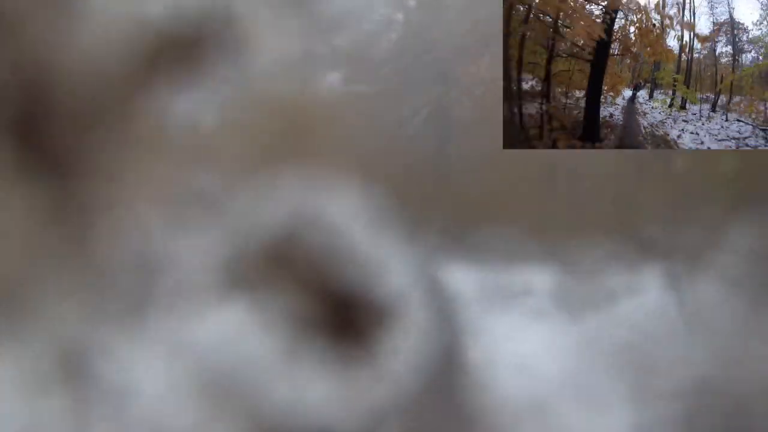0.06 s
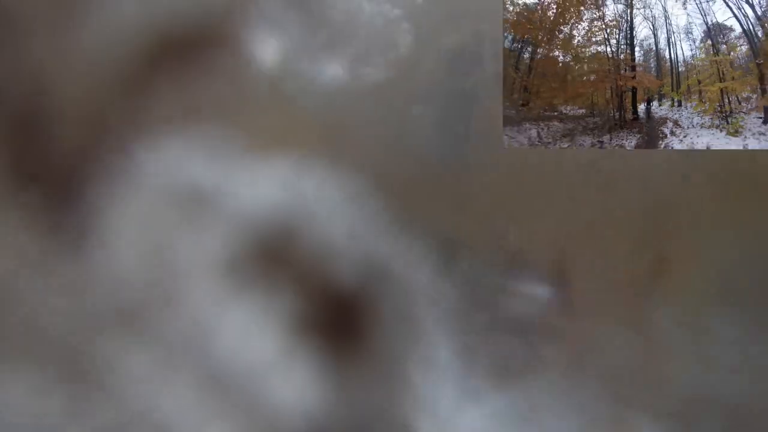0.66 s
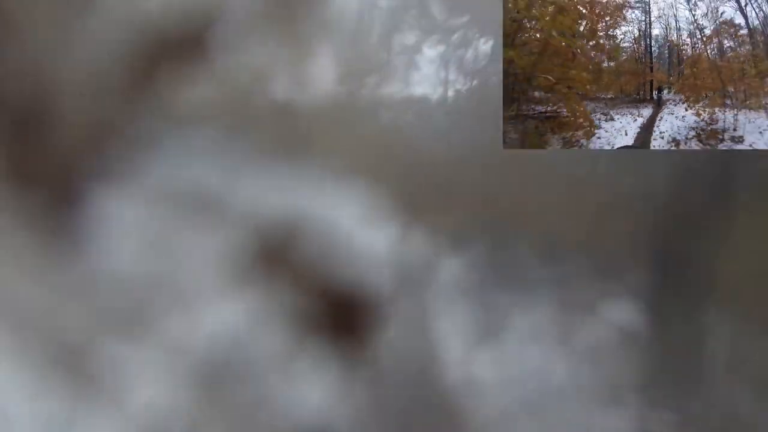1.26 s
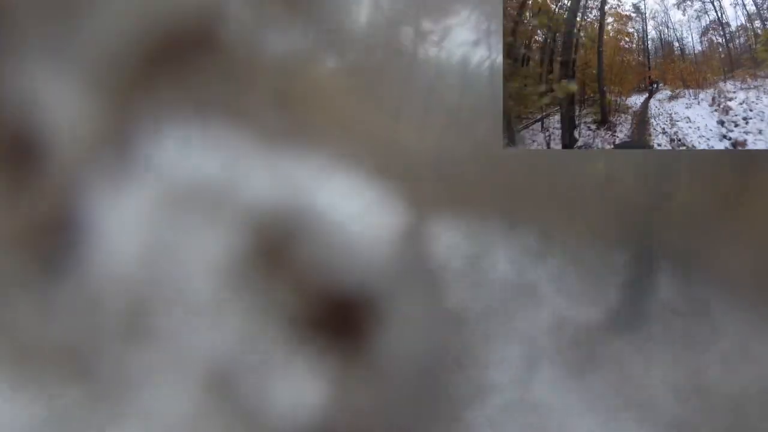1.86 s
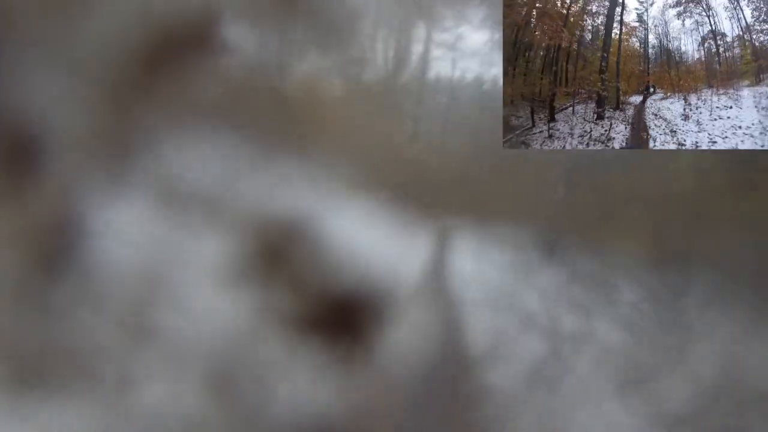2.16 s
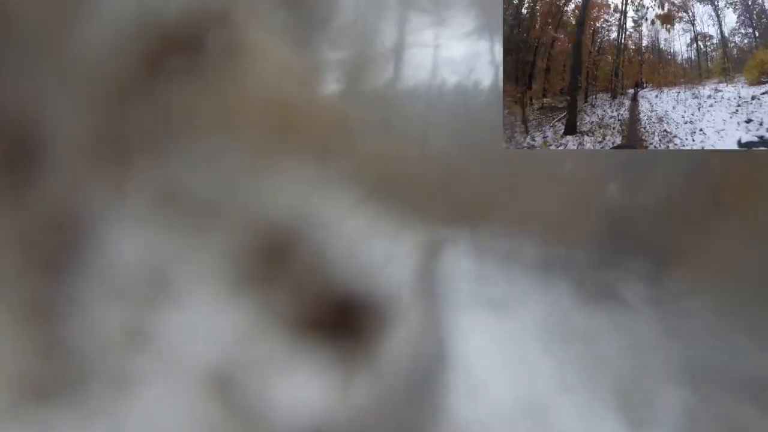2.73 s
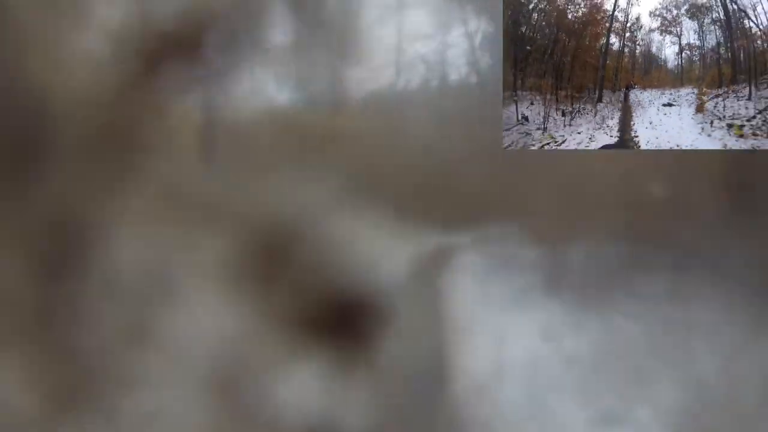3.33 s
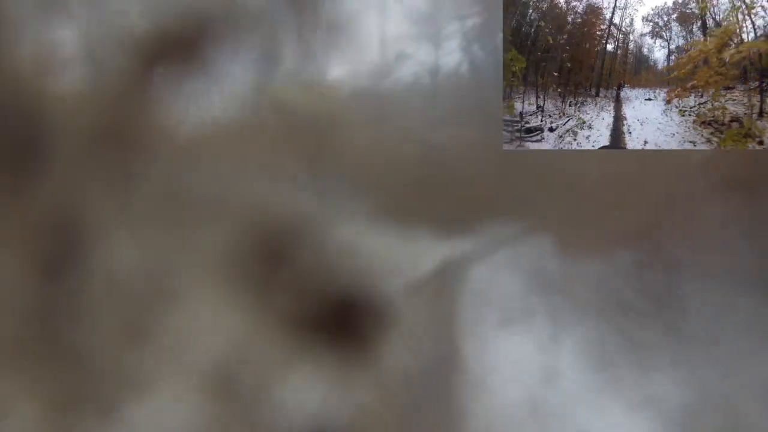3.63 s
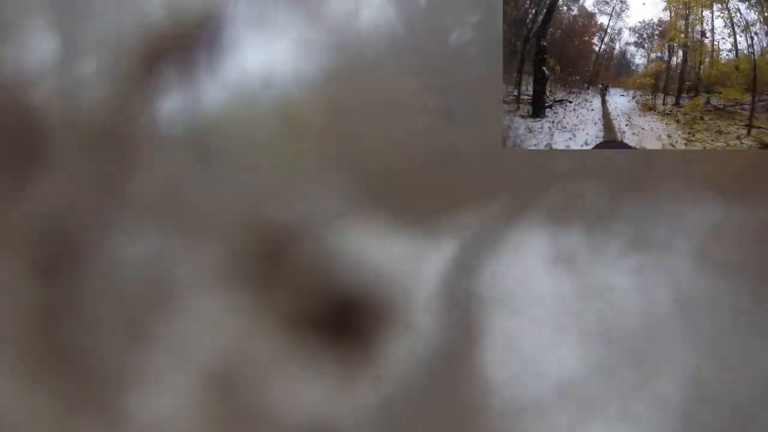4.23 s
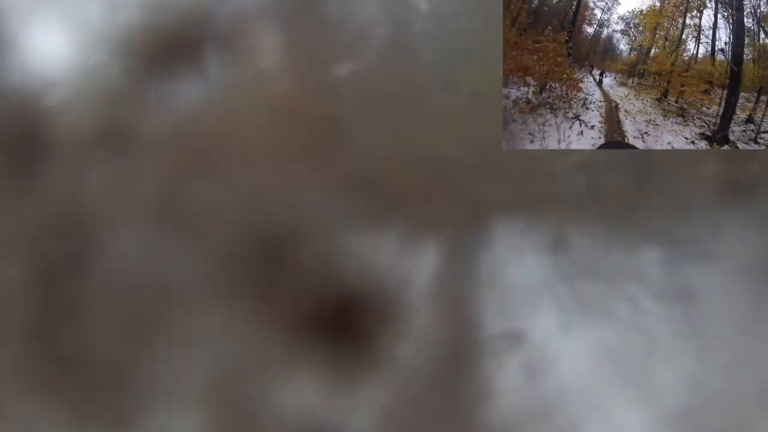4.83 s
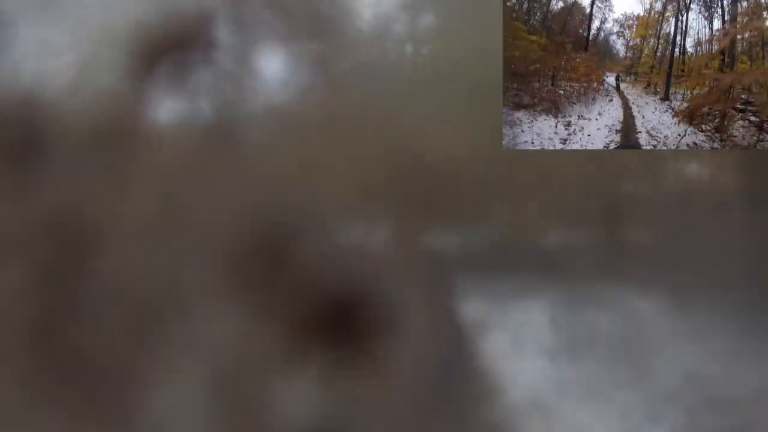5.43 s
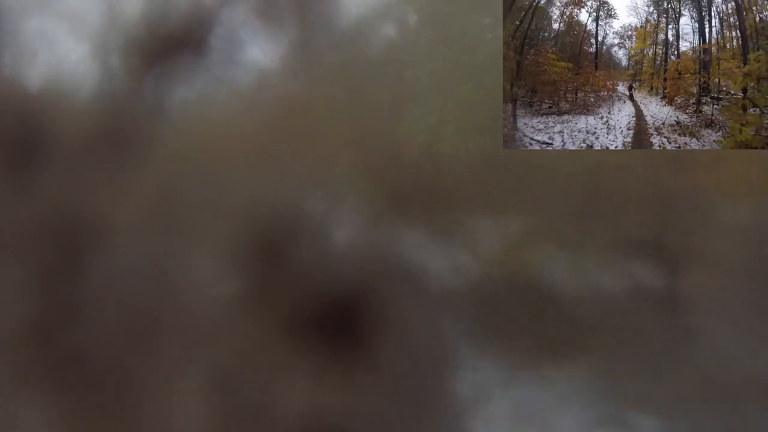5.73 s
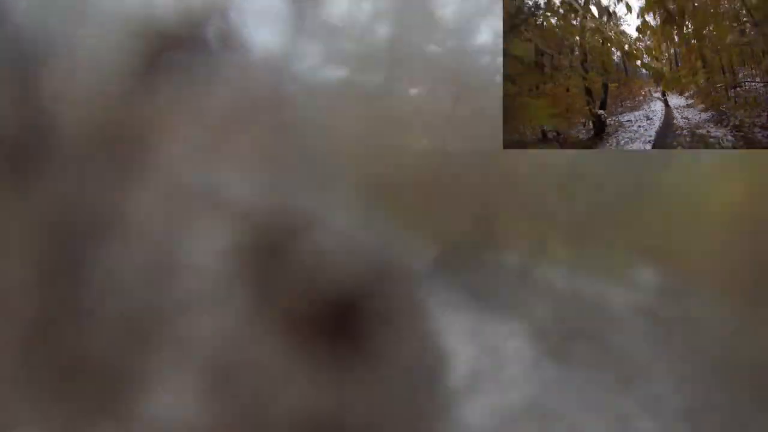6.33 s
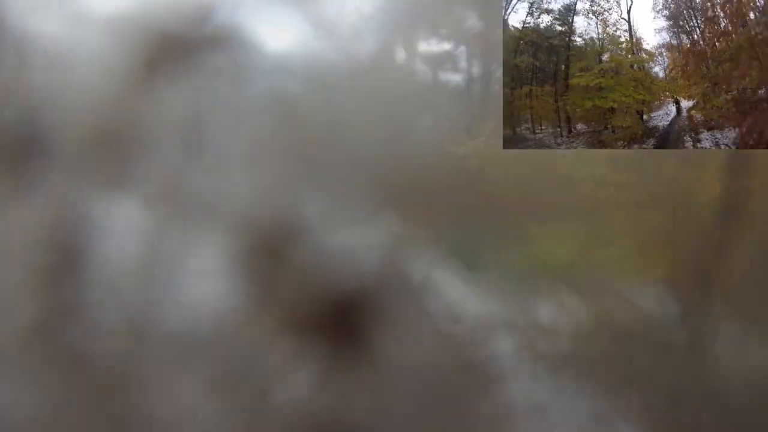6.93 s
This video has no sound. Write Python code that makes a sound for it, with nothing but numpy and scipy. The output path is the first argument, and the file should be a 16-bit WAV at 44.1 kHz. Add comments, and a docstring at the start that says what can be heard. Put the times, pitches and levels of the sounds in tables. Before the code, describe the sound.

Loud, uneven tyre rumble and gritty mud noise come from a mountain bike on a wet forest trail, picked up on the bike itself. Roots and stones knock it, the camera mount booms and its case rattles, with wind thumping on the microphone. After a couple of seconds, occasional light metal clinks join in, followed by a few brief buzzes from the tread.

```python
"""A muddy forest trail, heard close up from the microphone of a camera riding on a mountain bike.
From the start the tyres roar, going light after each bump, and roots and stones knock the bike; the
mount booms at its low resonance and the case rattles at the crests of its swings. Wind buffets the
microphone, hardest at about 1.6 s. From 2.6 s loose parts clink now and then, and between 3.3 and
6.3 s the tread buzzes in short stretches."""
import sys
import numpy as np
from scipy import signal
from scipy.fft import rfft, irfft, next_fast_len
from scipy.io import wavfile
from scipy.ndimage import uniform_filter1d, minimum_filter1d, map_coordinates

SR = 44100
rng = np.random.default_rng(int(sys.argv[2]) if len(sys.argv) > 2 else 0)


def inscribe(sig):
    """Save sig as 16-bit PCM at rate SR to the path in sys.argv[1].

    A 1-D sig is mono; a 2-D sig holds one channel per row.
    Samples are clipped to [-1, 1] before scaling.
    """
    pcm = np.round(np.clip(np.atleast_2d(sig).T, -1, 1) * 32767)
    wavfile.write(sys.argv[1], SR, pcm.astype(np.int16))


N = 312228

# tread rumble and mud roar along the trail: time_s, tread_db, mud_db
TYRE_LEVELS = [(0.0, -25.5, -42.5), (0.3, -20.5, -37.5), (0.44, -31, -42), (0.62, -20, -38),
               (0.68, -33.5, -43.5), (0.9, -23, -36.5), (1.04, -24.5, -43), (1.14, -22.5, -37.5),
               (1.92, -27.5, -42), (2.04, -18, -38.5), (2.14, -26, -42.5), (2.66, -22, -35.5),
               (2.82, -24, -40.5), (3.14, -23, -39.5), (3.22, -29.5, -43.5), (3.58, -17.5, -38),
               (3.7, -26.5, -37.5), (3.98, -21, -35), (4.1, -24, -39.5), (4.82, -28.5, -44.5),
               (4.92, -21.5, -38.5), (5.78, -25, -41.5), (5.92, -21, -39), (6.7, -27, -35.5),
               (6.8, -29.5, -42.5), (7.07, -22.5, -38)]
# bumps that set the camera mount booming: start_s, hold_s, swing_db
BUMPS = [(0.01, 0.11, -10), (0.231, 0.11, -11.5), (0.388, 0.0051, -7.5), (0.465, 0.045, -10.5),
         (0.608, 0.061, -7), (0.77, .04, -8.5), (0.919, 0.064, -7), (1.058, .12, -10), (1.246, 0.019, -7.5),
         (1.351, 0.045, -9.5), (1.49, 0.11, -13), (1.653, 0.012, -8), (1.824, 0.017, -10),
         (2.056, 0.074, -8.5), (2.209, 0.033, -11), (2.322, 0.031, -11), (2.487, 0.016, -13.5),
         (2.591, 0.072, -7.5), (2.772, 0.039, -11), (2.887, 0.025, -9), (3.012, 0.018, -9.5),
         (3.092, 0.11, -12.5), (3.217, 0.0036, -12.5), (3.325, 0.027, -10.5), (3.611, 0.022, -6),
         (3.729, 0.13, -9), (4.039, .05, -6), (4.188, 0.005, -7.5), (4.29, 0.022, -9.5),
         (4.412, 0.11, -10.5), (4.549, 0.11, -10.5), (4.709, .05, -11.5), (4.92, 0.018, -7),
         (5.041, 0.082, -13), (5.282, .015, -8), (5.379, 0.049, -10), (5.55, 0.068, -10.5),
         (5.708, 0.072, -10.5), (5.849, 0.35, -11.5), (6.052, 0.056, -18.5), (6.243, 0.23, -11),
         (6.4, 0.16, -10.5), (6.63, 0.047, -10.5), (6.711, .015, -12), (6.788, 0.12, -11.5),
         (6.958, 0.086, -14)]
# low resonances of the frame and tyres: pitch_hz, width_hz, gain_db
FRAME_MODES = [(154.6, 30.6, 1), (191.3, 37.5, 0), (231.66, 32, -7), (297.4, 41.6, -10), (376.2, 21, -15.5),
               (435.6, 43, -16)]
# resonances of the camera case: pitch_hz, width_hz, gain_db
CASE_MODES = [(642.5, 85, -4), (812, 114, -0.5), (852, 66, 3.5), (1200, 61, 0.5), (1360, 86, 2.5),
              (1540, 269, 2), (1620, 190, 3), (2004, 199, -0.5), (4630, 610, -29)]


def amp(db):
    """Decibels to gain."""
    return 10 ** (np.asarray(db) / 20)


def unit(x):
    """Scale to rms 1."""
    return x / np.sqrt(np.mean(x ** 2) + 1e-20)


def curves(rows):
    """One value per sample for each column after the time."""
    times, *columns = np.transpose(rows)
    return [np.interp(np.arange(N) / SR, times, column) for column in columns]


def wobble(rate):
    """A smooth random curve, rate knots a second."""
    return map_coordinates(rng.standard_normal(int(N * rate / SR) + 4), [np.arange(N) * rate / SR])


def filtered(x, response):
    """x through a complex response of frequency."""
    size = next_fast_len(N + SR // 2)
    return irfft(rfft(x, size) * response(np.fft.rfftfreq(size, 1 / SR)), size)[:N]


def coloured(x, points):
    """x through a curve of (frequency_hz, gain_db) points on a log axis."""
    points_hz, db = np.transpose(points)
    return filtered(x, lambda hz: amp(np.interp(np.log(hz + 1), np.log(points_hz), db)))


def resonate(x, modes):
    """x rings a body whose resonances alternate in sign."""
    return filtered(x, lambda hz: sum(
        (-1) ** k * amp(db) * 1j * hz * width / (pitch ** 2 - hz ** 2 + 1j * hz * width)
        for k, (pitch, width, db) in enumerate(modes)))


def add(track, start_s, sound):
    """Mix a sound into a track."""
    part = track[max(round(start_s * SR), 0):][:len(sound)]
    part += sound[:len(part)]


def taps(times, levels_db):
    """One hard contact at each time."""
    track = np.zeros(N)
    for start_s, db in zip(times, levels_db):
        add(track, start_s, amp([db]))
    return track


def bursts(times, levels_db, t60_s):
    """A short dying puff of noise at each time."""
    track, t = np.zeros(N), np.arange(SR // 5) / SR
    for start_s, db in zip(times, levels_db):
        add(track, start_s, amp(db - 60 * t / t60_s) * rng.standard_normal(len(t)))
    return track


def blow_envelope(times, holds, levels_db, fall_db_per_s, rise_s=0.026):
    """Envelope of blows that each rise, hold and die away, adding in power."""
    t, power = np.arange(N) / SR, np.zeros(N)
    for start_s, hold_s, db in zip(times, holds, levels_db):
        near = slice(max(int((start_s - rise_s) * SR), 0), int((start_s + hold_s + .3) * SR))
        age = t[near] - start_s
        rise = np.clip(1 + age / rise_s, 0, 1)
        power[near] += (rise * amp(db - fall_db_per_s * np.maximum(age - hold_s, 0))) ** 2
    return np.sqrt(power)


def wind(gust_db=2):
    """Eddies thump right on the microphone port."""
    # strength of the buffeting: time_s, level_db
    buffet_levels = [(0.0, -20.5), (0.12, -29.5), (1.26, -23), (1.32, -35), (1.56, -14), (1.63, -22),
                     (3.19, -22.5), (3.59, -36), (3.82, -22.5), (3.9, -31), (4.81, -18.5), (6.39, -26.5),
                     (6.68, -20), (7.08, -21.5)]
    # spectrum of the wind rumble: frequency_hz, gain_db
    rumble_colour = [(5, -38.5), (15, -21.5), (24, 10), (36, 1.5), (50, -12), (100, -5), (300, -26),
                     (1000, -101.5)]
    buffet_db, = curves(buffet_levels)
    gusts = amp(gust_db * wobble(16))
    return amp(buffet_db) * unit(gusts * coloured(rng.standard_normal(N), rumble_colour))


def spray(under_roar_db=-24.5, patter_db=3):
    """Slush hisses off the tyres along with the roar of the mud."""
    # spectrum of the fine wet spray: frequency_hz, gain_db
    spray_colour = [(1800, -36.5), (2600, 10), (3700, -1.5), (4400, -7), (5000, 5.5), (5400, -18.5),
                    (7200, -17.5), (12000, -29.5)]
    _, mud_db = curves(TYRE_LEVELS)
    patter = rng.standard_normal(N) * amp(patter_db * wobble(820))
    return amp(mud_db + under_roar_db) * unit(coloured(patter, spray_colour))


def tread_buzz():
    """The knobs of the tread buzz, swelling and fading, likely on firmer ground."""
    # stretches of buzzing: start_s, length_s, level_db
    stretches = [(3.278, 0.5, -36.5), (3.753, 0.4, -41), (4.95, 0.27, -36.5), (5.788, 0.53, -34.5)]
    # narrow resonances that the tread rings: pitch_hz, width_hz, gain_db
    buzz_modes = [(444, 16, 9), (616, 11, 3), (780, 16, 1), (1194, 65, -5), (1385, 17, -12.5),
                  (2032, 77, -6.5)]
    level = np.zeros(N)
    for start_s, length_s, db in stretches:
        add(level, start_s, amp(db) * np.sin(np.linspace(0, np.pi, int(length_s * SR))))
    return level * unit(resonate(rng.standard_normal(N), buzz_modes))


def tyre_load_db(dip_db=3, lag_s=0.045, width_s=.04):
    """The wheel rebounds off each bump, and the tyre quietens until it settles."""
    t = np.arange(N) / SR
    lightness = sum(np.exp(-((t - start_s - hold_s - lag_s) / width_s) ** 2)
                    for start_s, hold_s, _ in BUMPS)
    return -dip_db * (lightness - lightness.mean())


def tyres(rumble_db=-1, thump_db=-19, tread_lumps_db=2, mud_lumps_db=1.3, grit_db=3.5):
    """Tread shakes the frame in lumps, harder on meeting a bump; gritty mud roars through the case."""
    # what the case wall lets through: frequency_hz, gain_db
    case_wall = [(250, -21.5), (550, 10), (2120, -1.5), (2300, -1), (3600, 1.5), (4500, -23), (5500, -4),
                 (7000, -6), (11000, -13), (15000, -41)]
    tread_db, mud_db = curves(TYRE_LEVELS) + tyre_load_db()
    times, _, swing_db = np.transpose(BUMPS)
    thumps = blow_envelope(times, np.zeros(len(times)), swing_db + thump_db, fall_db_per_s=306)
    lumps = wobble(45)
    tread = resonate(rng.standard_normal(N) * amp(tread_lumps_db * lumps), FRAME_MODES)
    tread = coloured(tread, [(70, -19.5), (125, -9.5), (155, -1.5), (480, -1), (700, -4), (3000, -50)])
    mud = rng.standard_normal(N)
    mud *= amp(mud_lumps_db * np.minimum(lumps, 1) + grit_db * np.minimum(wobble(300), 1.5))
    mud = coloured(resonate(mud, CASE_MODES), case_wall)
    return np.hypot(amp(tread_db + rumble_db), thumps) * unit(tread) + amp(mud_db) * unit(mud)


def clinks(scrape_db=8, attack_s=.0045):
    """A loose metal part scrapes against its neighbour, then rings briefly."""
    # contacts of loose parts: start_s, level_db, pitch_hz, t60_s
    contacts = [(2.636, -17, 1380, 0.12), (2.859, -24, 1190, 0.12), (3.085, -21, 1540, .08),
                (3.885, -25, 1400, 0.1), (4.16, -28, 1370, 0.08), (4.410, -23, 1420, 0.03),
                (6.233, -16, 1430, 0.04), (6.662, -17, 1263, 0.07)]
    rings, t = np.zeros(N), np.arange(SR // 4) / SR
    for start_s, db, pitch_hz, t60_s in contacts:
        tone = np.sin(2 * np.pi * pitch_hz * t + rng.uniform(0, 2 * np.pi))
        add(rings, start_s, amp(db - 60 * t / t60_s) * (1 - np.exp(-t / attack_s)) * tone)
    times, levels_db = np.transpose(contacts)[:2]
    scrapes = bursts(times, levels_db + scrape_db, t60_s=0.045)
    scrape_colour = [(600, -44), (1150, -2), (1550, -6), (2000, -19), (3000, -16.5), (6000, -48)]
    return rings + coloured(scrapes, scrape_colour)


def knocks(clack_gain_db=11, thud_gain_db=20, contact_db=17):
    """Each blow, a hard contact and a short scrunch, clacks in the case and thuds in the frame."""
    # roots and stones that hit the bike: start_s, clack_db, thud_db
    hits = [(0.015, -18.5, -13.5), (0.385, -22, -26.5), (0.592, -24.5, -22.5), (1.356, -22.5, -13),
            (1.514, -32, -29), (1.824, -19, -11), (2.055, -25, -12.5), (2.425, -21.5, -9),
            (3.131, -20.5, -10.5), (3.214, -30, -8), (4.746, -30, -17.5), (4.903, -23.5, -13),
            (5.281, -20, -10), (5.544, -21, -16.5), (6.447, -23, -15), (6.863, -23, -47),
            (6.956, -27, -45.5)]
    times, clack_db, thud_db = np.transpose(hits)

    def blows(db, t60_s):
        return taps(times, db + contact_db) + bursts(times, db, t60_s)

    clack = resonate(blows(clack_db + clack_gain_db, t60_s=0.047), CASE_MODES)
    clack = coloured(clack, [(250, -19.5), (550, 8), (1500, -3), (2200, -14), (4000, 1), (12000, -32)])
    thud = resonate(blows(thud_db + thud_gain_db, t60_s=0.025), FRAME_MODES)
    return clack + coloured(thud, [(450, 4), (1000, -18), (3000, -47.5)])


def case_rattle(shake, play=0.42, chance=0.69, growth=0.56, slack_s=.0007, scatter_db=4,
                strays_per_s=120, stray_db=-7, tick_db=-49, snap_db=4, t60_s=.012):
    """The camera often ticks in its case when a swing uses up its play, and snaps on hard bumps."""
    # hardest snaps of the case: start_s, level_db
    snaps = [(0.3382, -31), (0.9707, -34), (1.2506, -32.5), (1.5175, -29), (1.5384, -31), (1.6906, -31),
             (1.8248, -33.5), (2.0587, -31.5), (2.0991, -35.5), (2.2128, -30.5), (2.5593, -32),
             (2.7704, -29), (3.1297, -32.5), (3.1576, -32), (4.1914, -28), (4.764, -34), (5.29, -28.5),
             (5.5473, -31.5), (6.2536, -33.5), (6.8628, -32), (6.9564, -30)]
    # spectrum of a tick: frequency_hz, gain_db
    tick_colour = [(500, -10), (1500, 4), (2500, 0), (3800, 4), (4600, -3), (5800, -3), (6500, -5),
                   (7250, 0), (8100, -9), (9300, -2), (10000, -8), (10800, -7), (12500, -17), (15500, -26)]
    swing = unit(filtered(shake, lambda hz: 1 / (1 + (hz / 220) ** 4)))
    crests = signal.find_peaks(swing, height=play)[0]
    jitter = (slack_s * SR * rng.standard_normal(N)).astype(int)
    touches = rng.random(N) < chance
    # stray ticks fall anywhere, more often far out in the swing
    contacts = amp(stray_db) * (rng.random(N) < strays_per_s * np.abs(swing) / SR)
    landings = np.clip(crests + jitter[crests], 0, N - 1)
    contacts[landings] += touches[crests] * (swing[crests] - play) ** growth
    contacts *= amp(scatter_db * np.clip(rng.standard_normal(N), -2, 1))
    t = np.arange(SR // 50) / SR
    power = np.abs(signal.fftconvolve(contacts ** 2, amp(-60 * t / t60_s) ** 2)[:N])
    ticks = amp(tick_db) * unit(np.sqrt(power) * rng.standard_normal(N))
    times, levels_db = np.transpose(snaps)
    ticks = coloured(ticks + bursts(times, levels_db + snap_db, t60_s), tick_colour)
    # each contact is a little harder or softer than the last
    treble = filtered(ticks, lambda hz: hz ** 4 / (hz ** 4 + 8000 ** 4))
    return ticks + treble * (amp(wobble(220)) - 1)


def mount_boom(steadiness=0.7, judder_db=1.92, sway_db=-17, sway_growth=.7, scatter_db=3, trim_db=-0.77):
    """Each bump rings the mount and rough ground keeps it swaying; damping evens out the swing."""
    # resonances of the camera mount: pitch_hz, width_hz, gain_db
    mount_modes = [(92.86, 9.9, -1), (71.3, 21, -26.5)]
    tread_db, _ = curves(TYRE_LEVELS)
    # soft tyres pass only slow pushes
    push_colour = [(25, -19), (60, 1), (102, -1), (130, -8), (250, -19.5), (600, -77.5)]
    pushes = coloured(rng.standard_normal(N), push_colour)
    ring = signal.hilbert(unit(resonate(pushes, mount_modes)))
    ring_size = np.sqrt(np.abs(uniform_filter1d(np.abs(ring) ** 2, size=700)) + 0.014)
    judder = amp(judder_db * wobble(32))  # small stones between the big bumps
    sway = amp(sway_db + sway_growth * (tread_db - tread_db.mean()) + scatter_db * wobble(24))
    swing = np.maximum(blow_envelope(*np.transpose(BUMPS), fall_db_per_s=224.5), sway)
    return amp(trim_db) * swing * unit(judder * ring.real / ring_size ** steadiness)


def scene():
    """Mono, on the bike: the boom, tyres, knocks and wind shake the camera and drive its rattle."""
    shake = mount_boom() + tyres() + knocks() + wind()
    return (shake + tread_buzz() + spray() + clinks() + case_rattle(shake))[None]


def record(dry, ceiling=.8, top_hz=15800):
    """The camera's limiter holds down the biggest swings; nothing passes above its band limit."""
    needed_gain = np.minimum(1, ceiling / (np.abs(dry[0]) + 1e-9))
    gain = uniform_filter1d(minimum_filter1d(needed_gain, size=900), size=600)
    return filtered(dry[0] * gain, lambda hz: hz < top_hz)[None]


dry = scene()
out = record(dry)
inscribe(out)
```